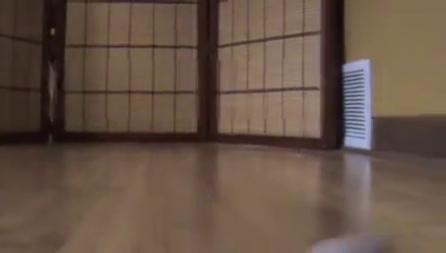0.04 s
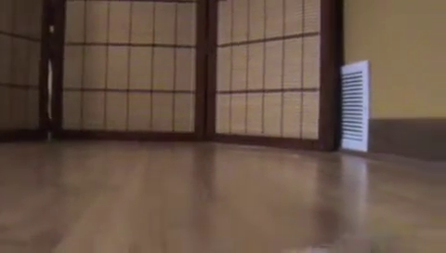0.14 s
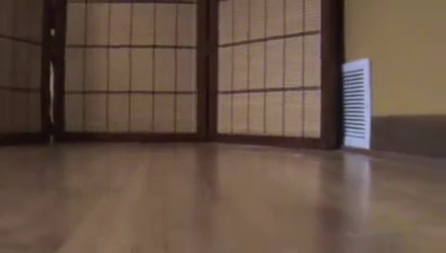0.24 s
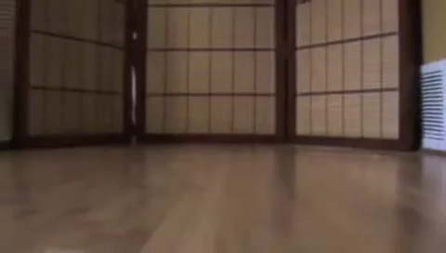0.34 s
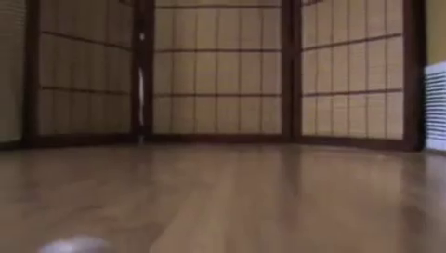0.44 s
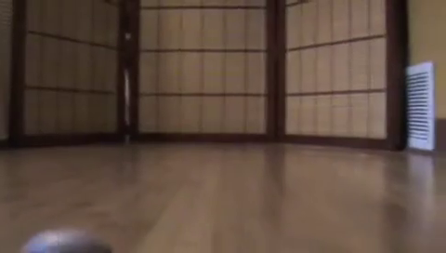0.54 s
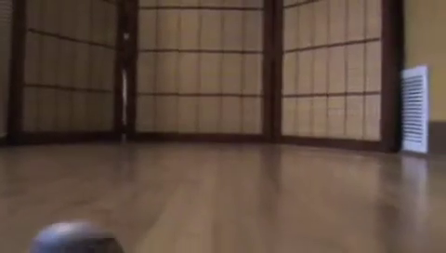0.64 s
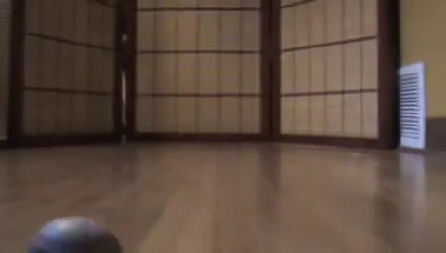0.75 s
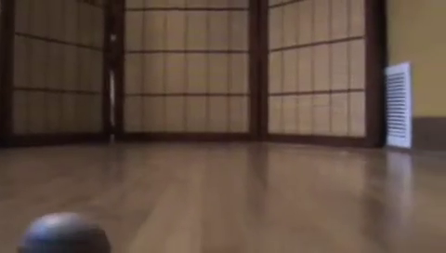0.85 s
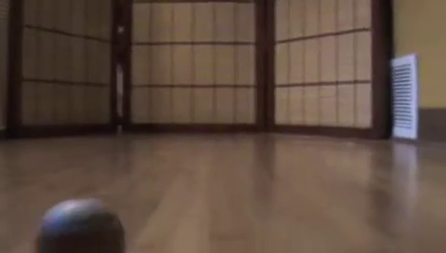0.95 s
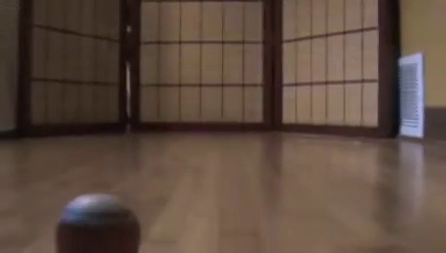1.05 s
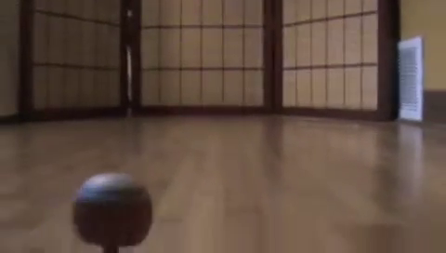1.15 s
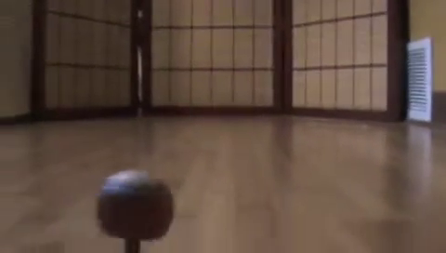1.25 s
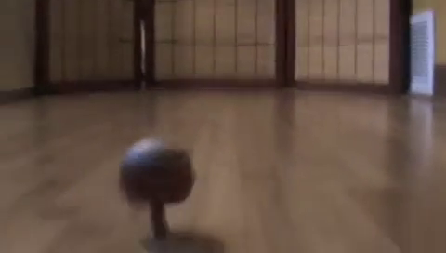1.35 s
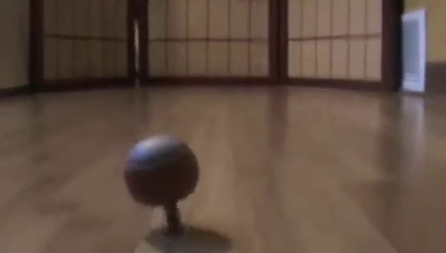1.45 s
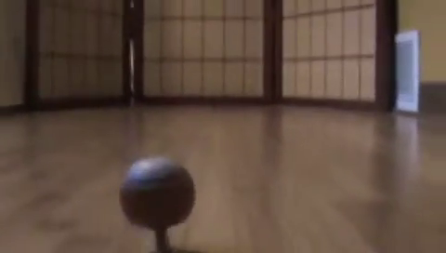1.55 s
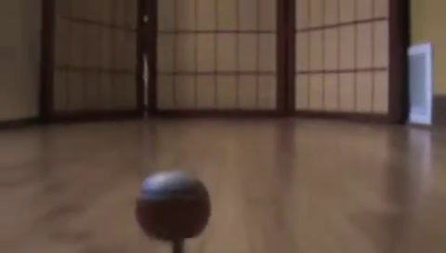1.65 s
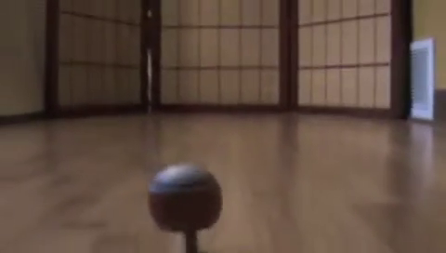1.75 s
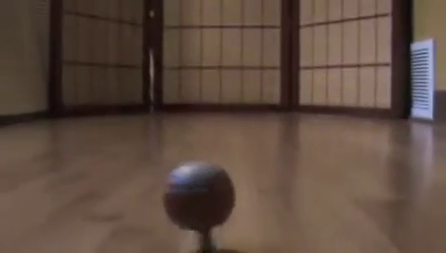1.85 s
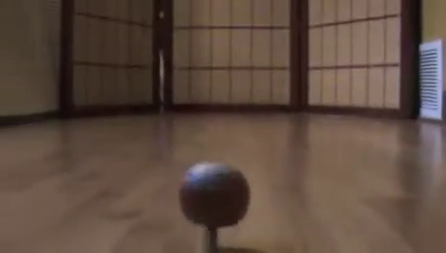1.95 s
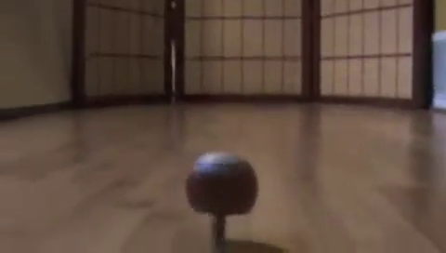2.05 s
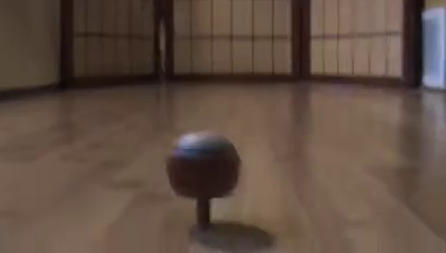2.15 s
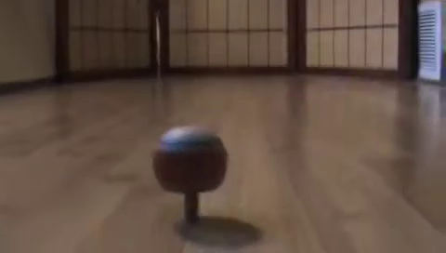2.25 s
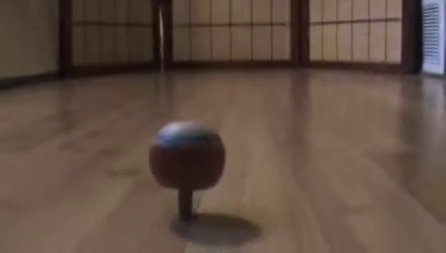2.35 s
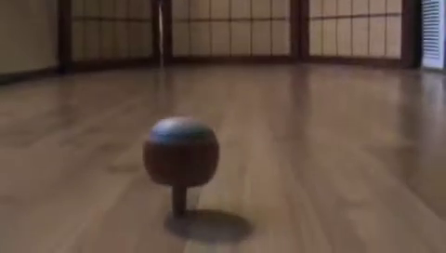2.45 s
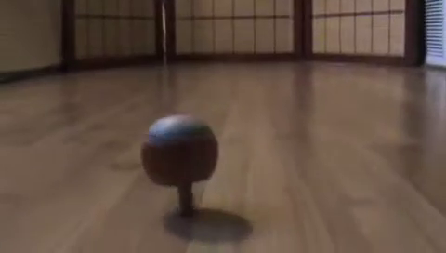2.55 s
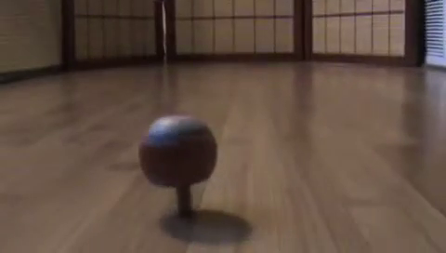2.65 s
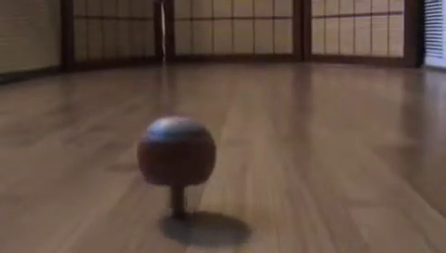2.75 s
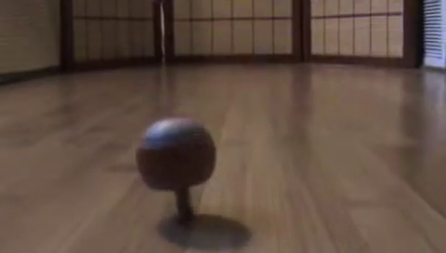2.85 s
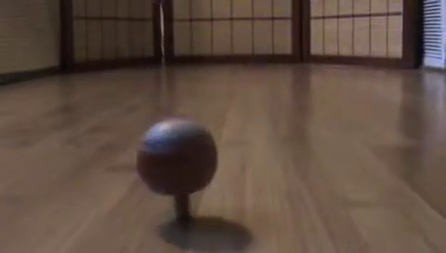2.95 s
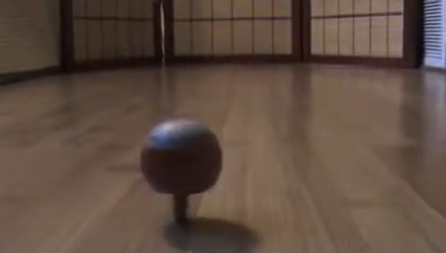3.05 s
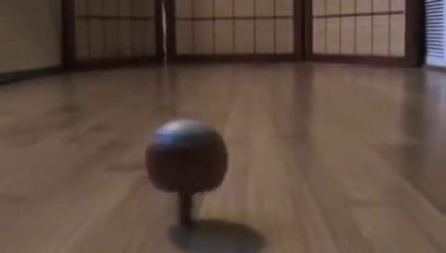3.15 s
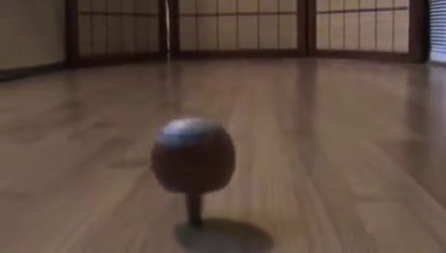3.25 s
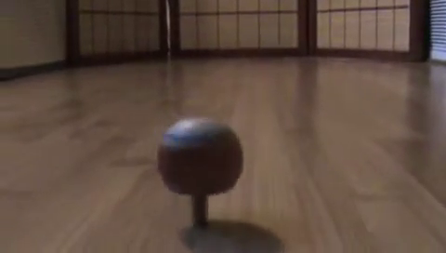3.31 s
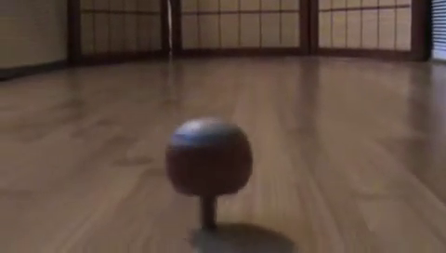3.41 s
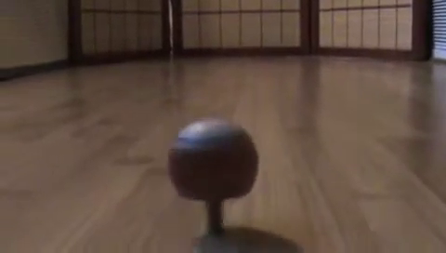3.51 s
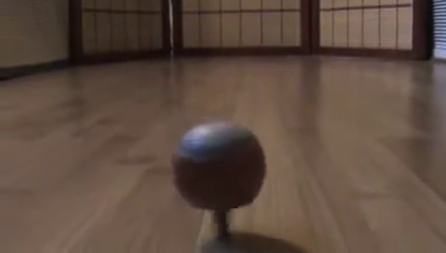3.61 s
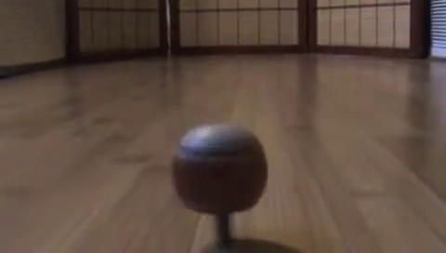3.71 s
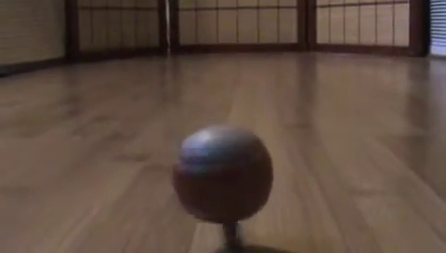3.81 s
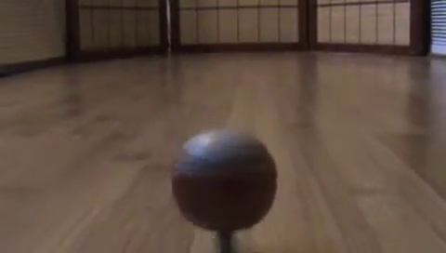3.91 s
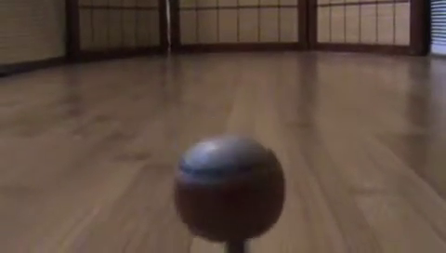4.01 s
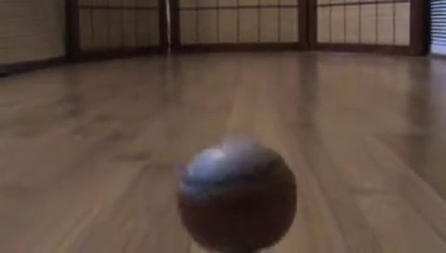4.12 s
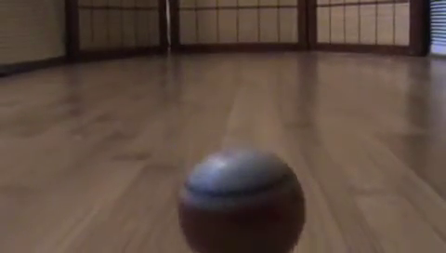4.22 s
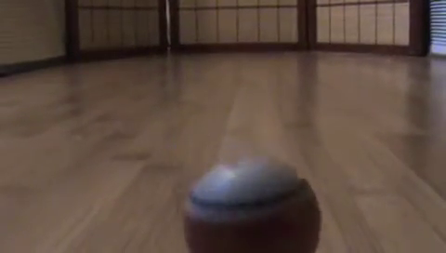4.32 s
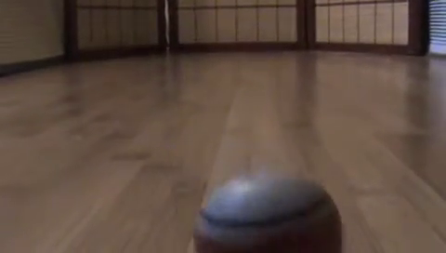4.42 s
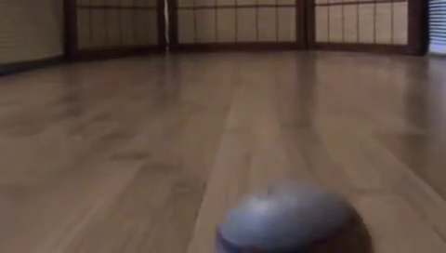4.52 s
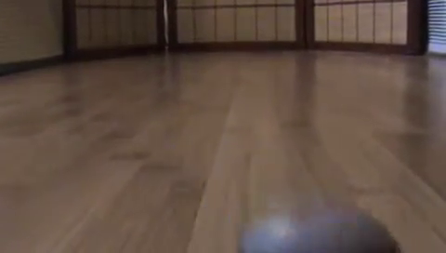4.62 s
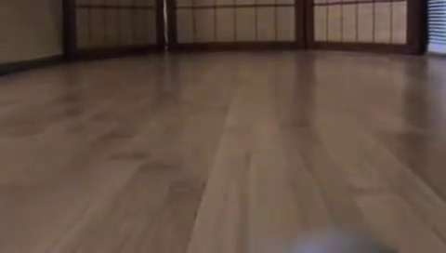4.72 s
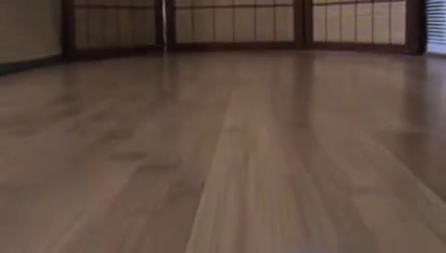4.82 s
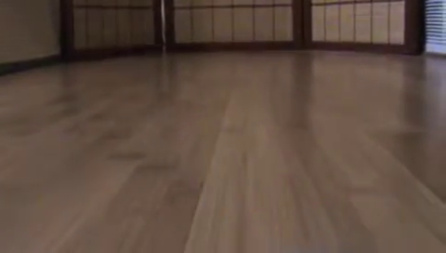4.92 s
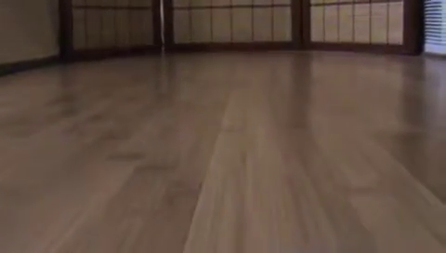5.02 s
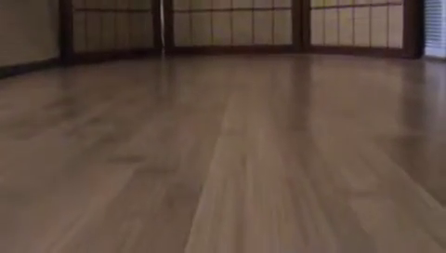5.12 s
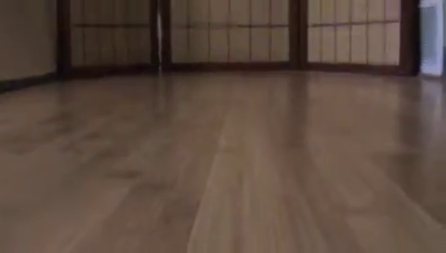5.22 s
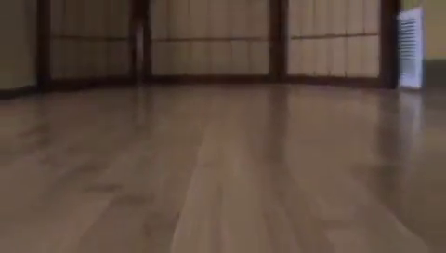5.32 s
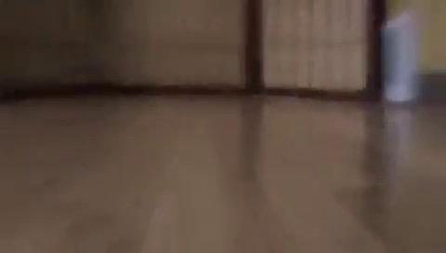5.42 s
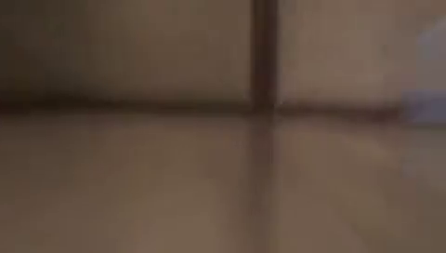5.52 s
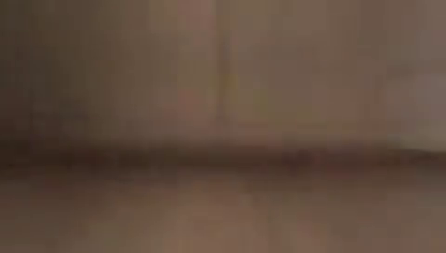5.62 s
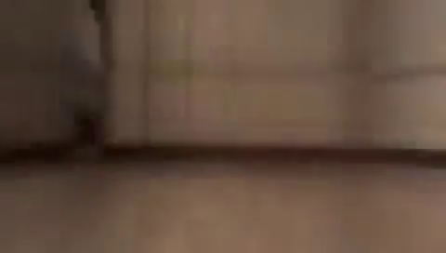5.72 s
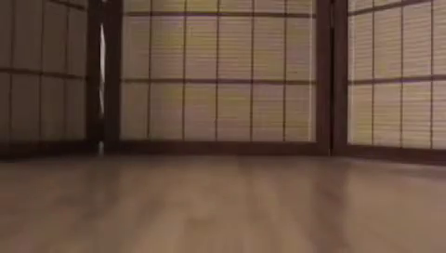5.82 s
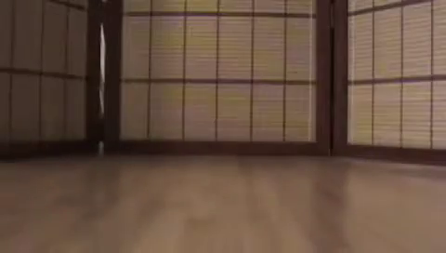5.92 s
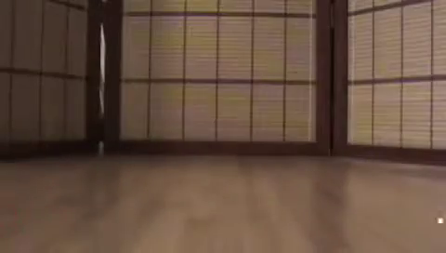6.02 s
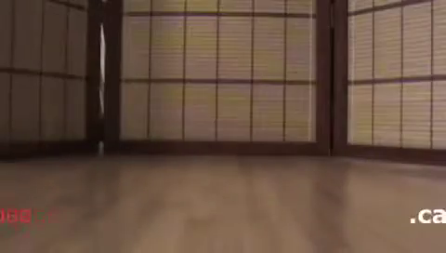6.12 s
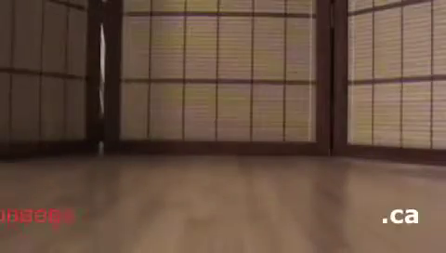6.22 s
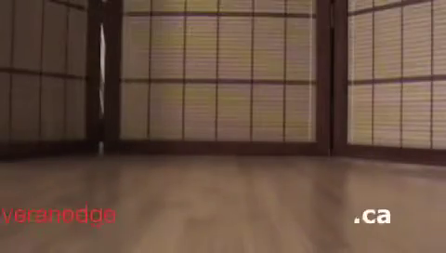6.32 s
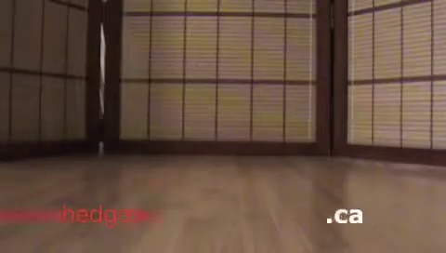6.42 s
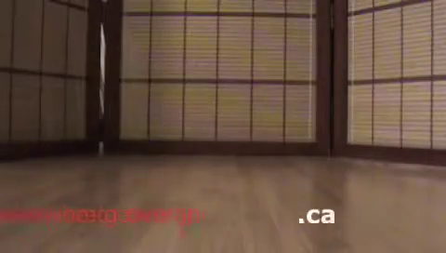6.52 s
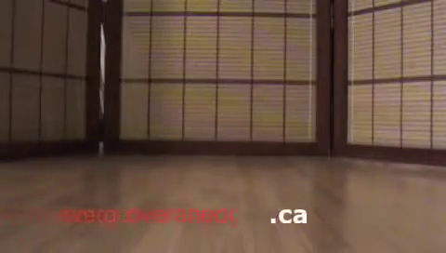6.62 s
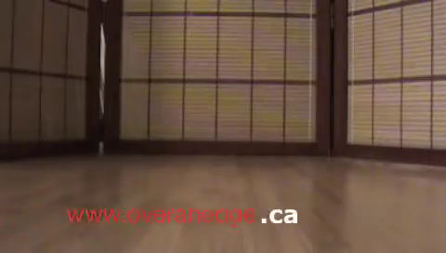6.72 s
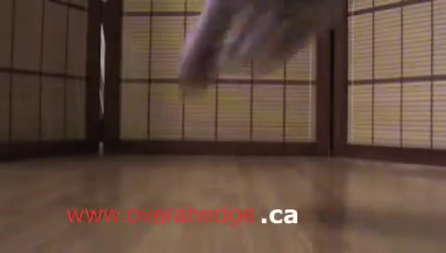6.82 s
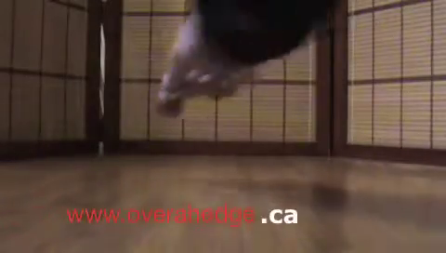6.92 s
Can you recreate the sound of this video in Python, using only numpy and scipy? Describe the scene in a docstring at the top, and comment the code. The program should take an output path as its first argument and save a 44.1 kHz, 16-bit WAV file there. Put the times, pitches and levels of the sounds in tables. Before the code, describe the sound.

A wooden top spins on a hardwood floor, ticking softly, then topples and rattles, between hissing scrapes and knocks of a sliding camera.

```python
"""A spinning top on a hardwood floor.

A wooden top ticks over the boards, then topples and rattles; each impact excites the modes of the wood.
A stereo camera lies on the same floor. A hand slides it along: friction makes it hiss and squeal,
and its case creaks, knocks and thumps. Below lie the hiss of a quiet room, a mains hum and a thin
motor whine. The sound fades out and in once, early on."""
import sys
import numpy as np
from scipy import signal
from scipy.fft import rfft, irfft, next_fast_len
from scipy.io import wavfile

SR = 44100
rng = np.random.default_rng(int(sys.argv[2]) if len(sys.argv) > 2 else 0)


def put_to_file(sound):
    """Save the sound as 16-bit audio at rate SR, in the file named by the first command-line argument."""
    columns = np.atleast_2d(sound).T  # one column per channel
    safe = np.clip(columns, -1, 1)
    whole_steps = np.round(safe * 32767)
    wavfile.write(sys.argv[1], SR, whole_steps.astype(np.int16))


N = 306914
TIME = np.arange(N) / SR


def amp(db):
    """Amplitude ratio from decibels."""
    return 10 ** (np.asarray(db) / 20)


def rms_one(x):
    """Normalisation to unit power."""
    return x / np.sqrt(np.mean(x ** 2) + 1e-20)


def noise(spectrum):
    """Spectral shaping of white noise, at unit power."""
    size = next_fast_len(N)
    hz, db = np.transpose(spectrum)
    bin_hz = np.arange(size // 2 + 1) * SR / size
    gain = amp(np.interp(np.log(bin_hz + 1), np.log(hz), db))
    return rms_one(irfft(rfft(rng.standard_normal(size)) * gain, size)[:N])


def resonate(x, hz, width_hz):
    """Second-order resonance with unit peak gain."""
    r = np.exp(-np.pi * width_hz / SR)
    gain = (1 - r * r) / 2
    return signal.lfilter([gain, 0, -gain], [1, -2 * r * np.cos(2 * np.pi * hz / SR), r * r], x + 1e-18)


def ring(force, hz, t60):
    """Damped oscillator: an impulse starts a sine that falls 60 dB in t60 seconds."""
    r, w = 1000 ** (-1 / (t60 * SR)), 2 * np.pi * hz / SR
    return signal.lfilter([0, np.sin(w)], [1, -2 * r * np.cos(w), r * r], force + 1e-18)


def flutter(rate_hz, depth_db):
    """Random amplitude modulation: a wandering gain."""
    return amp(depth_db * rms_one(resonate(rng.standard_normal(N), 0.91, rate_hz)))


def stereo(mid, side):
    """Left and right as the sum and difference of mid and side."""
    return np.array([mid + side, mid - side])


def add(out, start, sound):
    """Superposition of a short stereo sound, from start in seconds."""
    i = round(start * SR)
    out[:, i:i + sound.shape[1]] += sound[:, :N - i]


def train(events, db):
    """Impulse train: one click at the start of each event."""
    clicks = np.zeros(N)
    clicks[np.round(np.transpose(events)[0] * SR).astype(int)] = amp(db)
    return clicks


# Room noise spectra, mid and side. Each row: frequency in Hz, relative density in dB.
ROOM_MID = [(20, -21), (35, -4), (60, 0.5), (120, 1), (200, -15), (450, -10), (800, -20.5), (1500, -21.5),
            (4500, -26.5), (9000, -26.5), (12000, -26.5), (16000, -19)]
ROOM_SIDE = [(59, -45), (100, -16), (360, -8.5), (607, -7), (1180, -6), (1940, -8.5), (2230, -10.5),
             (7880, -22.5), (12000, -41), (15600, -57), (22000, -120)]
HUM_HZ, HUM_DB = (59.3, 118.6, 12285), (-63.5, -55, -70.5)


def room():
    """Broadband hiss under a line spectrum: mains hum, its octave and a motor whine, all wavering."""
    tones = sum(amp(db) * flutter(19, 1) * np.sin(2 * np.pi * hz * TIME)
                for hz, db in zip(HUM_HZ, HUM_DB))
    return stereo(amp(-53.5) * noise(ROOM_MID) + tones, amp(-58.5) * noise(ROOM_SIDE))


# Friction envelopes, a list per slide. Each row: time in seconds, then hiss, squeal and rumble in dB.
SLIDES = [
    [(0.0, -57, -70, -38), (0.18, -62.5, -66, -49), (0.38, -45, -62, -51), (0.53, -41, -51, -59),
     (0.76, -42, -47.5, -48.5), (0.95, -43, -56, -63), (1.33, -44.5, -59, -58), (1.49, -45.5, -69, -43),
     (1.6, -54, -75, -54.5), (1.75, -45.5, -55, -57.5), (1.88, -43.5, -52.5, -52), (2.03, -47, -53, -56.5),
     (2.1, -54.5, -67, -59), (2.7, -75.5, -80, -92)],
    [(5.22, -73, -51, -45.5), (5.286, -59, -75, -68), (5.504, -53, -60, -46.5), (5.626, -57.5, -81, -55),
     (5.72, -52.5, -59, -50.5), (5.79, -49.5, -41, -55), (5.93, -43.5, -43, -73), (6.02, -45.5, -55, -59),
     (6.35, -46.5, -57.5, -53), (6.696, -41.5, -56, -60.5), (6.806, -44.5, -56.5, -48.5),
     (6.96, -42, -52, -49)],
]
# Spectra of rubbing and twisting, a list per slide. Each row: frequency in Hz, relative density in dB.
RUB_SPECTRA = [
    [(350, -78), (600, -11.5), (891, -8), (1020, -22), (1630, -10.5), (6180, -7), (8480, -13.5),
     (9550, -14), (11800, -25), (14000, -24)],
    [(350, -38), (600, -10), (1140, -8.5), (1700, -3.5), (6100, -0.5), (8260, -5.5), (9680, -16),
     (12000, -17), (12900, -51), (14000, -24)],
]
TWIST_SPECTRA = [
    [(120, -55), (200, -21), (437, -13), (522, -9.5), (890, -11), (1120, -2.5), (1540, 0.5), (3040, -13),
     (11900, -19.5), (14000, -29)],
    [(120, -41), (200, -14), (407, -12), (670, -7), (859, -12), (1250, -4), (7650, -7), (12100, -3.5),
     (14000, -15)],
]
# Whistling feet, a list per slide. Each row: frequency in Hz, bandwidth in Hz, relative level in dB.
SQUEALS = [
    [(9460, 940, 0), (6200, 820, -4), (2407, 250, -5.5)],
    [(9600, 1600, 1), (6800, 1400, -8.5), (2470, 600, -36)],
]
# Coupling, a row per slide. Each row, in dB: hiss to case, rumble to case, hiss to twist, rumble to twist.
COUPLINGS = [(-4.5, -7.5, -0.5, -10), (-29, -19, -7.5, -21)]
CASE_HZ, CASE_WIDTH_HZ = 1032, 270


def slide():
    """Sliding friction hisses, squeals and rumbles; it drives the case resonance and twists the case."""
    out = np.zeros((2, N))
    white = rng.standard_normal((3, N))
    case = flutter(8.4, 1.5) * rms_one(resonate(white[0], CASE_HZ, CASE_WIDTH_HZ))
    rumble = flutter(19, 4.5) * rms_one(resonate(white[2], hz=314, width_hz=366))
    for rows, rub, twist, bands, coupling in zip(SLIDES, RUB_SPECTRA, TWIST_SPECTRA, SQUEALS, COUPLINGS):
        times, *levels = np.transpose(rows)
        hiss_gain, squeal_gain, rumble_gain = [amp(np.interp(TIME, times, db)) for db in levels]
        squeal = squeal_gain * sum(amp(db) * rms_one(resonate(resonate(white[1], hz, width), hz, width))
                                   for hz, width, db in bands)
        shaken = hiss_gain * amp(coupling[0]) + rumble_gain * amp(coupling[1])
        twisted = hiss_gain * amp(coupling[2]) + rumble_gain * amp(coupling[3])
        mid = hiss_gain * noise(rub) + shaken * case + squeal + rumble_gain * rumble
        side = twisted * noise(twist) + 0.5 * np.roll(squeal, 40)
        onset, release = (TIME - times[0] + 0.02) * 20, (times[-1] + 0.5 - TIME) * 2
        out += np.clip(np.minimum(onset, release), 0, 1) * stereo(mid, side)
    return out


# Slips of one foot of the case. Each row: start in seconds, relative level in dB.
SLIPS = [(0.715, -15), (.737, -25.5), (.748, -31), (.775, -36), (.795, -40)]
SQUEAK_HZ = 9970


def squeak():
    """Stick-slip friction: each slip of the foot excites a high, narrow resonance."""
    slips = ring(train(SLIPS, np.transpose(SLIPS)[1]), SQUEAK_HZ, t60=0.037)
    tone = amp(-42) * ring(slips, SQUEAK_HZ, t60=0.042) * flutter(54, 3.5)
    return stereo(tone, 0.84 * np.roll(tone, 2))


# The case thumps on the boards. Each row: start in seconds, relative level in dB, frequency in Hz,
# decay time in seconds.
THUMPS = [(0.056, -41, 96, 0.11), (0.131, -30.5, 110, 0.038), (0.145, -26, 117, 0.038),
          (0.219, -29, 121, 0.015), (0.29, -40.5, 100.4, 0.049), (0.7, -44, 79, 0.036),
          (0.738, -27, 96.6, 0.076), (0.81, -27.5, 141, 0.037), (0.931, -35.5, 137, 0.022),
          (1.454, -20, 139, 0.022), (1.489, -29.5, 168, 0.041), (1.521, -30.5, 150, 0.058),
          (2.205, -25.5, 143, 0.018), (5.459, -22.5, 129, 0.016), (5.712, -26.5, 117.3, 0.017),
          (6.3, -40.5, 203, 0.045), (6.465, -38, 69, 0.096)]


def thumps():
    """Damped vibration: a soft blow starts a few low cycles, which the hand absorbs."""
    out = np.zeros((2, N))
    for start, db, hz, decay in THUMPS:
        t = np.arange(int(3 * max(decay, 0.01) * SR)) / SR
        envelope = (1 - np.exp(-t / 0.0012)) * np.exp(-2 * (t / decay) ** 2)
        wave = envelope * np.sin(2 * np.pi * hz * t)
        add(out, start, amp(db + 1.5) * stereo(wave, 0.23 * np.roll(wave, 60)))
    return out


# Knocks and creaks of the case. Each row: start in seconds, body level in dB, crack relative to it in dB,
# resonance in Hz, left over right in dB.
KNOCKS = [(0.069, -26, -19, 700, -4), (0.119, -21, -20, 800, -3), (0.18, -35.5, 9, 1140, -6),
          (0.22, -12.5, -13, 1080, 2), (0.232, -21, -10.5, 985, -9), (0.271, -22.5, 1.5, 1100, -4),
          (0.285, -41.5, 15, 470, 5), (0.3, -24.5, 11, 1370, -7), (0.323, -29.5, 2.5, 1330, -1),
          (0.342, -19, -7, 1150, -5), (0.377, -15, 4, 1400, -5), (0.645, -19.5, -7.5, 1200, -5.5),
          (0.727, -11.5, -14, 765, -1), (0.743, -21.5, -7, 332, -1), (0.9, -28, 2.5, 1110, -4),
          (0.929, -24, -6, 1080, -9), (1.318, -24, -23, 343, 0.5), (1.392, -28, -11, 340, -2),
          (1.406, -26.5, 7.5, 1150, -3.5), (1.454, -14, -15, 945, 3.5), (1.647, -24, -10, 1190, -5.5),
          (1.682, -30.5, -2, 1840, -3), (1.706, -19.5, 0.5, 1140, -4.5), (1.979, -37, -1, 570, -1.0),
          (2.095, -35, -16, 467, -1), (2.2, -30, -23, 750, 0), (2.326, -35, -25, 360, -3),
          (5.271, -33.5, -6, 780, -6), (5.292, -41.5, 2, 785, -4), (5.447, -25, -13, 840, 0),
          (5.47, -27, 0, 310, -2), (5.476, -27, -21, 754, 10.5), (5.526, -24.5, 3.5, 1180, -3),
          (5.562, -23.5, -27, 685, -4), (5.638, -42, -13, 484, 2.5), (5.701, -37, 1, 1490, 0),
          (5.72, -30, -23, 1300, -12), (5.748, -32.5, -16, 326, -3), (5.85, -40.5, -10, 900, -2),
          (5.895, -39.5, -10, 1500, 0), (6.455, -37, -15, 1600, -1), (6.89, -40, -20, 600, -1)]
KNOCK_T60_S, KNOCK_DAMPING = 0.063, 0.16  # decay time at -26.5 dB; louder knocks die sooner
JUDDER_S, JUDDER_GAP_S = 1.461, 0.0146  # the case judders on after one hard knock, grinding in seven weakening knocks


def knocks():
    """Transient excitation: a burst of uneven contact rings the case; the bright crack decays faster."""
    out, t = np.zeros((2, N)), np.arange(SR // 5) / SR
    bright = signal.butter(2, [2200, 7500], "band", fs=SR, output="sos")
    dull = signal.butter(3, [200, 1650], "band", fs=SR, output="sos")
    judder = [(JUDDER_S + k * JUDDER_GAP_S, -17.5 - 1.9 * k, -23, 920, 0) for k in range(7)]
    for start, db, crack_db, hz, pan_db in KNOCKS + judder:
        t60 = KNOCK_T60_S * amp(-KNOCK_DAMPING * (db + 26.5))
        envelope = (1000 ** (-t / t60) + 1.2 * np.exp(-t / 0.0006)) * np.minimum(t / 0.00099, 1)
        burst = rng.standard_normal((2, len(t))) * envelope
        low = signal.sosfilt(dull, burst)
        case = resonate(low[0], CASE_HZ, CASE_WIDTH_HZ)
        body = resonate(low[0], hz, 0.43 * hz) + 0.048 * case + 0.25 * low[0]
        twist = resonate(0.7 * low[0] + low[1], hz=1150, width_hz=950)
        crack = signal.sosfilt(bright, burst * 1000 ** (-t / 0.029))
        body, twist, crack = [part / np.abs(part).max() for part in (body, twist, crack)]
        sound = stereo(body + amp(crack_db) * crack[0], amp(2) * twist + amp(crack_db - 3) * crack[1])
        add(out, start + 0.001145, amp(db) * amp([[pan_db / 2], [-pan_db / 2]]) * sound)
    return out


FALL_S, REST_S = 4.887, 5.235  # the top topples, then comes to rest
FAR_S, FAR_DB, LEAVE_DB_PER_S, NEAR_DB_PER_S = 2.89, -80.5, 32.5, 14.5  # the tip draws away, then nears
TIP_MAX_DB, TIP_HZ, TIP_LATE_S, TIP_LATE_HZ = -60, 890, 4.36, 1540
RIM_DB, RIM_ATTACK_S, RIM_SAG_DB_PER_S, RIM_SLOWS_S, RIM_DIES_DB_PER_S = -29.5, 0.025, 9, 5.18, 197
RIM_HZ, RIM_SAG_HZ_PER_S = 2216, 3100
TIP_TINKLE_DB, RIM_TINKLE_DB, WOBBLE_S = -77, -52, 0.076  # the tinkle swells just before the fall


def spin():
    """Rolling contact of tip, then rim: level, bandwidth and tinkle. The rim dulls as it spins down."""
    nearness_db = np.maximum(LEAVE_DB_PER_S * (FAR_S - TIME), NEAR_DB_PER_S * (TIME - FAR_S))
    tip_db = np.minimum(FAR_DB + nearness_db, TIP_MAX_DB)
    since = TIME - FALL_S
    rim_db = RIM_DB - RIM_SAG_DB_PER_S * since - RIM_DIES_DB_PER_S * np.maximum(TIME - RIM_SLOWS_S, 0)
    level_db = tip_db + np.clip(since / RIM_ATTACK_S, 0, 1) * (rim_db - tip_db)
    tip_hz = np.where(TIME < TIP_LATE_S, TIP_HZ, TIP_LATE_HZ)
    rim_hz = np.where(TIME < REST_S, np.maximum(RIM_HZ - RIM_SAG_HZ_PER_S * since, TIP_HZ), TIP_LATE_HZ)
    tinkle_db = np.interp(since, [-WOBBLE_S, 0], [TIP_TINKLE_DB, RIM_TINKLE_DB])
    return level_db, np.where(since < 0, tip_hz, rim_hz), np.where(TIME < REST_S, tinkle_db, -120)


# The tip crosses board seams; the fallen top drums on the boards.
# Each row: start in seconds, relative level in dB, tinkle offset in dB.
SEAM_TICKS = [(2.326, -43, -3), (2.538, -39.5, -11), (2.796, -43, -14), (2.929, -41, -14),
              (3.057, -30.5, -23), (3.085, -38, -16), (3.327, -33, -26), (3.358, -36.5, -20),
              (3.413, -34.5, -8), (3.599, -25, -30), (3.625, -32, -24), (3.689, -42, -17),
              (3.759, -41, -15), (3.806, -29, -18), (3.881, -42, -22), (3.965, -35.5, -28),
              (4.005, -30, -30), (4.05, -32, -25), (4.084, -29, -18), (4.162, -26, -26), (4.243, -46, -23),
              (4.282, -37.5, -25), (4.332, -37.5, -25), (4.37, -22, -21), (4.431, -39, -23),
              (4.459, -31, -15), (4.525, -37.5, -20), (4.561, -21.5, -24.5), (4.62, -34.5, -20),
              (4.705, -37.5, -11), (4.769, -30.5, -37), (4.83, -29, -35), (4.881, -25.5, -13)]
RATTLE = [(4.8922, -6, -43), (4.9158, -7.5, -14), (4.929, -9.5, -34), (4.9403, -7, -25),
          (4.9442, -7.4, -22), (4.9565, -9, -25), (4.9669, -16, -30), (4.9792, -8, -38),
          (4.9944, -6.5, -37.0), (5.0017, -21.5, -11), (5.0134, -8, -41.0), (5.0247, -10.5, -35),
          (5.0333, -11, -40.0), (5.0447, -10, -42), (5.06, -10, -25), (5.0768, -11, -38),
          (5.0836, -13, -33), (5.1077, -14, -38), (5.1192, -14.5, -36), (5.1269, -12, -41),
          (5.142, -18, -30), (5.154, -25, -16), (5.1658, -25, -17)]
# A corner of the case taps the boards. Each row: start in seconds, relative level in dB.
CASE_TAPS = [(0.2224, -12), (5.4792, -23.5), (5.487, -37), (5.724, -18.5), (5.7325, -22), (5.7405, -27),
             (5.747, -31)]
FAINT_TICK_DB, BOUNCE_DB, BOUNCE_LOSS_DB_PER_S = -53, -18, 60


def impacts():
    """Soft and hard collisions, joined by random ticks on the grain and bounces that lose energy."""
    when, size = rng.random((12, 2)).T
    faint = np.transpose([2.4 + when * (FALL_S - 2.5), FAINT_TICK_DB + 10 * (size - 0.5), [-17] * 12])
    when, size = rng.random((20, 2)).T
    since = (np.arange(20) + when) / 20 * (REST_S - FALL_S)
    bounce_db = BOUNCE_DB - BOUNCE_LOSS_DB_PER_S * since + 11 * (size - 0.5)
    bounces = np.transpose([FALL_S + since + 0.01, bounce_db, -48 - bounce_db])
    taps = [(start, db, -57) for start, db in CASE_TAPS]
    return np.vstack([SEAM_TICKS, faint]), np.vstack([RATTLE, bounces, taps])


# Reflections along the boards. Each row: delay in seconds, relative level in dB.
REFLECTIONS = [(.0022, -1), (.0038, -4), (.0076, -10.5)]


def contacts(events, bandwidths_hz, delay_s, echo_db):
    """An impact is a Gaussian force pulse, shorter when hard; the air carries its second derivative."""
    out, t = np.zeros((2, N)), np.arange(-64, 64) / SR
    for (start, db, _), hz in zip(events, bandwidths_hz):
        u = (np.pi * hz * t) ** 2
        bell = np.exp(-u)
        force_and_air = np.array([bell / bell.sum(), (1 - 2 * u) * bell])
        add(out, start + delay_s - 64 / SR, -amp(db) * force_and_air)
    echoes = sum(amp(db) * np.roll(out, round(lag * SR), axis=1) for lag, db in REFLECTIONS)
    return out + amp(echo_db) * echoes


# Modes of boards and top. Each row: frequency in Hz, gain under the tip in dB, gain under the rim in dB,
# 60 dB decay time in seconds, sideways gain in dB.
BOARD_MODES = [(186, -7, -11.5, 0.11, -21), (364.8, -3.5, -10, 0.061, -28), (503, -7.5, -11, 0.042, -40),
               (717, -5, -10, 0.034, -1.5), (804, -9, -10, 0.062, -32), (1105, -42, -18.5, 0.16, 14),
               (1338, -2.5, -0.5, 0.022, -12), (1615, -0.5, 5.5, 0.016, -25), (1990, -1, 7.5, 0.012, -15),
               (2550, -27, 8, 0.014, -23), (3120, -18, 18, 0.013, -30)]


def boards(tick_force, blow_force, blow_air, roughness, contact_hz):
    """Modal superposition, mid and side: coupling to each mode varies as the tip wanders."""
    fallen = TIME > FALL_S
    upright = ~fallen * flutter(4.5, 3.5)  # the tip finds rough and smooth wood
    mid, side = np.zeros(N), 0.35 * blow_air
    for hz, tip_db, rim_db, t60, side_db in BOARD_MODES:
        rolling = roughness / (1 + (hz / contact_hz) ** 6)  # soft contact reaches only low modes
        tip = amp(tip_db) * flutter(16, 4) * (amp(-10) * tick_force + upright * rolling)
        rim = amp(rim_db) * (amp(-22.5) * blow_force + fallen * rolling)
        mode = ring(tip + rim, hz, t60)
        mid += mode
        side += amp(side_db) * np.roll(mode, round(SR / hz / 4) + 20)  # sideways shaking lags
    # narrow boards radiate no deep bass and damp the treble
    wood = signal.butter(3, [190, 3300], "band", fs=SR, output="sos")
    return signal.sosfilt(wood, [mid, side])


# Small, stiff modes of the top. Each row: frequency in Hz, gain in dB, 60 dB decay time in seconds.
TOP_MODES = [(6100, -9, 0.0037), (8070, -3, 0.014), (9170, -3, 0.015), (10200, -7, .004)]


def tinkle(events, scrape):
    """High modes of the top, excited by impacts and scraping, each radiating near its own frequency."""
    out = np.zeros(N)
    for hz, db, t60 in TOP_MODES:
        strikes = train(events, events[:, 1] + events[:, 2] + rng.normal(0, 3.7, len(events)))
        force = strikes + flutter(25, 5.5) * scrape
        out += amp(db) * resonate(ring(force, hz, t60), hz, width_hz=2400)
    return out


def skid(ticks, offset_db, decay_s=0.026):
    """Exponential envelope of the tip's rough skid after each tick."""
    return signal.lfilter([1], [1, -np.exp(-1 / (decay_s * SR))], train(ticks, ticks[:, 1] + offset_db))


def top(grains_per_s=1600):
    """Forced vibration: impacts and the dense grains of surface roughness drive boards and top."""
    roll_db, contact_hz, tinkle_db = spin()
    ticks, blows = impacts()
    touches = rng.random(N) < grains_per_s / SR
    sizes = amp(2.8 * np.minimum(rng.exponential(1, N), 4))
    grains = rms_one(touches * sizes * rng.choice([-1, 1], N))
    tick_hz = 975 * amp(0.32 * (ticks[:, 1] + 27) + rng.normal(0, 2.65, len(ticks)))  # louder is brighter
    blow_hz = contact_hz[(blows[:, 0] * SR).astype(int)]
    tick_force, tick_air = contacts(ticks, tick_hz, delay_s=0.00161, echo_db=0)
    blow_force, blow_air = contacts(blows, blow_hz, delay_s=0, echo_db=-11.5)
    roughness = amp(-20.5) * (amp(roll_db) + skid(ticks, -26.5)) * grains
    mid, side = boards(tick_force, blow_force, blow_air, roughness, contact_hz)
    scrape = (amp(tinkle_db - 20) + amp(-33) * skid(ticks, ticks[:, 2])) * grains
    treble = tinkle(np.vstack([ticks, blows]), scrape)
    cracks = train(blows, 1.2 * blows[:, 1] - 21 + rng.normal(0, 4, len(blows)))
    treble += ring(cracks + (TIME > FALL_S) * amp(roll_db - 31.5) * grains, hz=5600, t60=0.0017)
    return stereo(mid + amp(-8.5) * tick_air + blow_air + treble, side + 0.14 * treble)


def scene():
    """Linear superposition of the camera case, the top and the room."""
    return slide() + squeak() + knocks() + thumps() + top() + room()


DIP_S, DIP_DB, FADE_OUT_S, FADE_IN_S, CUTOFF_HZ = 0.394, -35.5, 0.077, 0.078, 16500


def record(dry):
    """Attenuation: the level dips briefly, and a steep low-pass removes the highest treble."""
    t = TIME - DIP_S
    dip = np.clip(1 - np.maximum(-t / FADE_OUT_S, t / FADE_IN_S), 0, 1) ** 2.2
    lowpass = signal.cheby2(12, 70, CUTOFF_HZ, fs=SR, output="sos")
    return signal.sosfilt(lowpass, dry * amp(DIP_DB * dip))


dry = scene()
out = record(dry)
put_to_file(out)
```